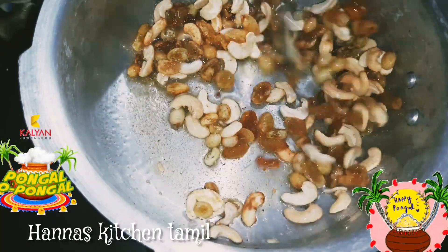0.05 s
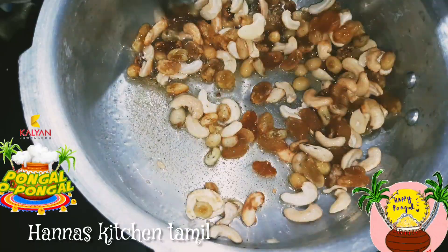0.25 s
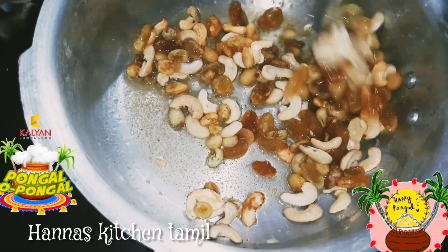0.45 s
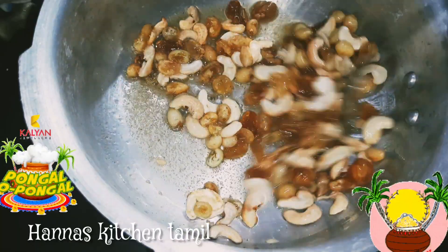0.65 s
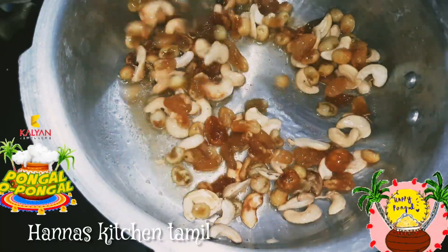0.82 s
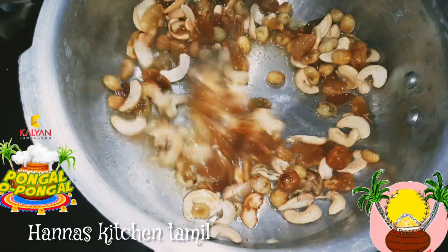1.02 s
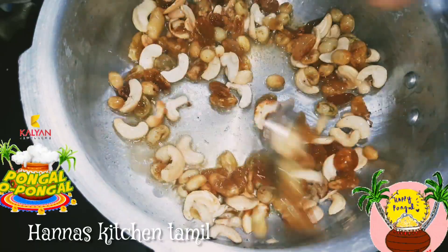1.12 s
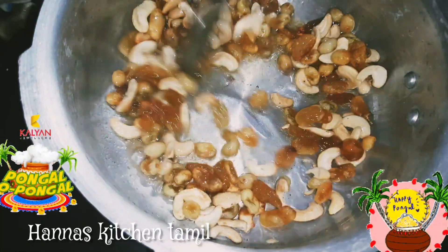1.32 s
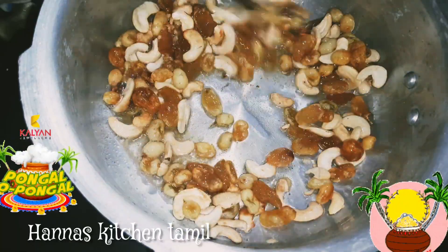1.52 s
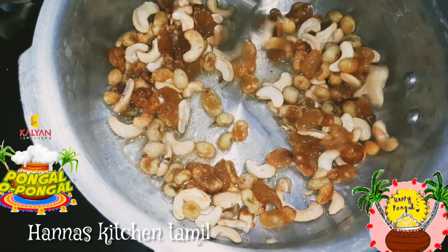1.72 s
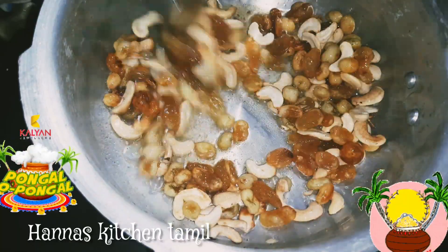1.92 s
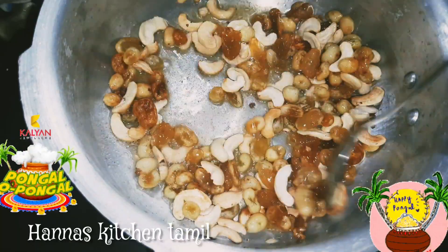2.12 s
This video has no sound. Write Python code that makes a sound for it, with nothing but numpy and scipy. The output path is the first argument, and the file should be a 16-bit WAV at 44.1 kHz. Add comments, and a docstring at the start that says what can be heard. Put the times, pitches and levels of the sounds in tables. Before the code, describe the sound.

Stirring frying nuts in a metal pot, with ringing spoon clinks, crackling fat and one hollow knock

```python
"""Nuts and raisins fry in a little fat in a thick metal pot, close up in a small kitchen.
The fat is flickering coloured noise under tiny sine bubbles, with snapping noise bursts for the spits.
Sliding nuts are a wavering low murmur, and dropped ones are single ringing modes.
A metal spoon clinks four times on the wall: a clash of dense noise, then a bank of ringing modes.
Once the base takes a hollow knock with a faint rebound. A stove rumbles below as low noise."""
import sys
import numpy as np
from scipy import signal
from scipy.fft import rfft, irfft, next_fast_len
from scipy.io import wavfile
from scipy.ndimage import uniform_filter1d, minimum_filter1d, map_coordinates

SR = 44100
rng = np.random.default_rng(int(sys.argv[2]) if len(sys.argv) > 2 else 0)


def transcribe(signal):
    """Save signal, clipped to [-1, 1], as a 16-bit WAV file at the path in sys.argv[1]."""
    frames = np.atleast_2d(signal).T
    limited = np.clip(frames, -1, 1)
    pcm = np.round(limited * 32767).astype(np.int16)
    wavfile.write(sys.argv[1], SR, pcm)


N = 94815


def amp(db):
    """Decibels to gain."""
    return 10 ** (np.asarray(db) / 20)


def unit(x):
    """Scaled to rms 1."""
    return x / np.sqrt(np.mean(x ** 2) + 1e-20)


def along(points, hz):
    """(Hz, value) points read on a log frequency axis."""
    point_hz, value = np.transpose(points)
    return np.interp(np.log(hz + 1), np.log(point_hz), value)


def over_time(points):
    """(s, value) points read at every sample of the scene."""
    return np.interp(np.arange(N) / SR, *np.transpose(points))


def around(hz, centre_hz):
    """A bell-shaped weight about an octave wide."""
    return np.exp(-2 * np.log2((hz + 1) / centre_hz) ** 2)


def add(track, start_s, sound):
    """Mix a stereo sound in at its start time, cut off at the end of the track."""
    part = track[:, round(start_s * SR):][:, :sound.shape[-1]]
    part += sound[..., :part.shape[1]]


def wobble(knots_per_s):
    """A smooth random curve through normally distributed knots."""
    knots = rng.standard_normal(512)
    return map_coordinates(knots, [np.arange(N) * knots_per_s / SR], mode="wrap")


def noise(colour_db, size):
    """Stereo noise of rms 1, its width and balance set per frequency; colour_db is a function of Hz."""
    # left-right likeness, 1 = identical, 0 = unrelated: pitch_hz, likeness
    alike = [(60, 0.7), (200, 0.86), (700, 0.65), (1400, 0.42), (3000, -0.13), (8000, 0.33), (15000, 0.36)]
    # how much louder the left is than the right: pitch_hz, left_right_db
    balance = [(60, 1.5), (200, 4), (700, 1.5), (1400, 0), (2400, -0.5), (7500, -2), (10000, 6.5),
               (15000, 3)]
    hz = np.fft.rfftfreq(size, 1 / SR)
    turn = np.arccos(np.clip(along(alike, hz), -1, 1)) / 2
    spectra = rfft(rng.standard_normal((2, size))) * amp(colour_db(hz))
    mid, side = spectra * [np.cos(turn), np.sin(turn)]
    lean = amp(along(balance, hz) / 2)
    return unit(irfft([(mid + side) * lean, (mid - side) / lean], size))


def fading(x, t60s, hold_s=0):
    """After a hold, each frequency of x dies at its own speed."""
    hz, t, z = signal.stft(x, SR, nperseg=128)
    gain = amp(-60 * np.maximum(t - hold_s, 0) / along(t60s, hz)[:, None])
    return signal.istft(z * gain, SR, nperseg=128)[1]


def ring(hz, t60_s, swell_s, lead_rad=0):
    """Half a second of one mode in stereo: it swells, then decays; the left leads by a phase angle."""
    t = np.arange(SR // 2) / SR
    decay = np.exp(-np.log(1000) * t / t60_s)
    swell = (1 - np.exp(-t / swell_s)) ** 2
    phase = np.array([[lead_rad], [-lead_rad]]) / 2
    return decay * swell * np.sin(2 * np.pi * hz * t + phase)


def kitchen(x, wet_db, delay_s=.008):
    """A sound followed by the room's short answer, a delayed tail of decaying noise."""
    # decay of the room: pitch_hz, t60_s
    room_t60 = [(150, 0.15), (800, 0.23), (3000, 0.3), (12000, 0.095)]
    tail = fading(rng.standard_normal((2, SR // 2)), room_t60)
    tail = np.pad(tail / np.linalg.norm(tail[0]), ((0, 0), (round(delay_s * SR), 0)))
    return x + amp(wet_db) * signal.fftconvolve(x, tail, axes=1)[:, :x.shape[1]]


def sizzle(crackle_db=-6, middle_hz=8000, cycles=5):
    """Fat hisses, with tiny bursting bubbles on top, each a decaying sine a few cycles long."""
    # colour of the hiss: pitch_hz, relative_db_per_hz
    hiss_colour = [(500, -10.5), (1900, -4.5), (3200, -4), (4200, -3.5), (6000, -3.5), (7600, 2.5),
                   (9400, -10), (12000, -2), (15600, -9)]
    # it swells as the spoon turns fresh food onto the hot base: time_s, level_db
    hiss_level = [(0, -39), (.22, -37.5), (.4, -39), (.78, -38.5), (.92, -36.5), (1.02, -38.5),
                  (1.22, -35.5), (1.38, -39), (1.66, -35.5), (1.9, -38.5), (2.15, -36.5)]
    bubbles_per_s, spread_db = 900, 2.5
    count = int(bubbles_per_s * N / SR)
    when, pitch, size, side, lag = rng.random((count, 5)).T[:, :, None]
    k = np.arange(128)
    # pitches cluster around the middle one, with rarer ones far off
    hz = np.clip(middle_hz * 2 ** (.4 * np.log(pitch / (1 - pitch))), 1500, 15500)
    turns = hz * k / SR
    # most bubbles are faint, a few are loud
    grains = amp(-spread_db * np.log(size + 0.01)) * np.exp(-turns / cycles)
    at = ((when * N).astype(int) + k).ravel()

    def channel(gain, shift):
        waves = grains * gain * np.sin(2 * np.pi * (turns + shift))
        return np.bincount(at, waves.ravel(), N + len(k))[:N]

    # the crackle leans well to the left; each bubble has a random phase on the right
    crackle = np.array([channel(8.4 * np.sqrt(side), 0), channel(np.sqrt(1 - side), lag)])
    flicker = amp(2.38 * wobble(160))
    hiss = noise(lambda hz: along(hiss_colour, hz), N) * flicker
    return amp(over_time(hiss_level)) * (hiss + amp(crackle_db) * unit(crackle))


def nuts():
    """Nuts slide over the base in a hollow murmur; a few drop onto it, each ringing one short mode."""
    # colour of the sliding: pitch_hz, relative_db_per_hz
    slide_colour = [(280, -15), (420, -7), (480, -16), (600, 0), (720, -8.5), (850, -7.5), (1030, -37),
                    (1400, -2.5), (1800, -54), (4000, -29.5)]
    # loudness of the sliding: time_s, level_db
    slide_level = [(0, -53), (.4, -47), (2.15, -45.5)]
    # nuts dropping off the spoon: start_s, level_db, pitch_hz
    tumbles = [(0.336, -30.5, 1460), (0.358, -28.5, 1536), (.495, -33, 598), (.851, -30.5, 608),
               (1.104, -32.5, 602), (1.328, -32, 837), (1.332, -30.5, 608), (1.607, -34.5, 856),
               (1.963, -34.5, 650), (2.076, -32.5, 597)]
    drops = np.zeros((2, N))
    for start_s, level_db, pitch_hz in tumbles:
        add(drops, start_s, amp(level_db) * ring(pitch_hz, t60_s=0.06, swell_s=0.00049))
    waver = amp(2.5 * wobble(35.4))
    slide = unit(noise(lambda hz: along(slide_colour, hz), N) * waver)
    return kitchen(drops, wet_db=-7.5) + amp(over_time(slide_level)) * slide


def stove():
    """The stove's low rumble is steady noise shaped to the bass."""
    # colour of the rumble: pitch_hz, relative_db_per_hz
    rumble_colour = [(28, -54), (58, -6.5), (140, -0.5), (200, -2.5), (300, -11.5), (600, -21)]
    return amp(-49.5) * noise(lambda hz: along(rumble_colour, hz), N)


def spits(snap_s=0.00088, rattle=0.37, rattle_t60_s=0.016, half_width_octaves=0.27):
    """Larger droplets burst with a sharp snap that rattles briefly round the pot."""
    # spits of fat, levels relative to each other: start_s, level_db, pitch_hz
    droplets = [(.046, -22, 6540), (0.0512, -24, 7300), (0.094, -24, 7650), (0.105, -22, 12000),
                (0.1486, -19.5, 8800), (0.4349, -23.5, 4130), (.506, -29.5, 7600), (0.5686, -20, 4800),
                (0.6366, -20.5, 5500), (0.96, -17, 9400), (0.966, -22, 6240), (1.0289, -20.5, 3600),
                (1.288, -22.5, 6500), (1.2969, -24, 10700), (1.531, -13, 9200), (1.5611, -20.5, 10600),
                (1.576, -23, 6000), (1.679, -25, 5700), (1.685, -22.5, 6400), (1.955, -20.5, 6640),
                (2.002, -23.5, 7380)]
    all_db = -12  # trims every spit
    out, t = np.zeros((2, N)), np.arange(512) / SR
    envelope = np.exp(-t / snap_s) + rattle * np.exp(-np.log(1000) * t / rattle_t60_s)
    for start_s, level_db, pitch_hz in droplets:

        def band_db(hz):
            octaves = np.log2((hz + 1) / pitch_hz)
            return -10 * np.log10(1 + (octaves / half_width_octaves) ** 4)

        burst = noise(band_db, len(t))
        add(out, start_s, amp(level_db + all_db) * unit(burst * envelope))
    return kitchen(out, wet_db=-13)


def clash(far_db=0, tilt_db=0, rise_s=0.00067):
    """The burst of countless short-lived modes at a hard contact, made of fading noise."""
    # colour of the contact: pitch_hz, relative_db_per_hz
    clash_colour = [(25, -54), (55, -3.5), (250, -16.5), (800, 1), (1500, -3), (2600, 0), (4500, 0),
                    (8000, 3), (10000, -3.5), (15500, -5.5)]
    # decay of the contact: pitch_hz, t60_s
    clash_t60 = [(100, 0.25), (1000, 0.052), (14000, 0.018)]
    far_hz = 4300  # the far side clashes brighter around here
    hold_s = 0.0041  # sound trapped in the pot holds the clash up before it fades

    def colour_db(hz):
        return along(clash_colour, hz) + far_db * around(hz, far_hz) + tilt_db * np.log2(1 + hz / far_hz)

    t = np.arange(SR // 2) / SR
    burst = fading(noise(colour_db, SR), clash_t60, hold_s)[:, :len(t)]
    return burst * (1 - np.exp(-t / rise_s))


def spoon():
    """Every clink is a brief clash, then the clear ring of the wall, coloured by where the spoon lands."""
    # spoon on the wall, place 0 = usual spot .. 1 = far side:
    # start_s, level_db, scrape_db, place, clang_db, scrape_tilt_db_per_octave
    clinks = [(0.2312, -20.5, -16.5, 0.16, -9.5, 3), (0.5714, -22.5, -11.5, 0.88, -1.5, 0),
              (1.427, -20.5, -10, 0.18, -1, 2.5), (1.8217, -22.5, -15, 0, 2.5, -1)]
    # modes of the wall: pitch_hz, level_db, t60_s, swell_s, left_right_db, left_lead_rad, far_side_change_db
    wall_modes = [(383, -12, 0.24, 0.013, 0, 1.5, 4.5), (423.2, 5, 0.25, 0.023, 1.5, -0.07, -17),
                  (1126.5, -10.5, 0.16, 0.0016, 8, -1.5, -1), (1275, 1.5, 0.17, 0.0022, -2, -2, -6.5),
                  (1426, -2.5, 0.021, 0.00049, -25, 3.5, -14), (2089, -1, 0.23, 0.0003, -0.5, 2.5, 3),
                  (2090, 21.5, 0.25, .3, 11, 2, 18.5), (2122, 3.5, 0.078, 0.0011, -8, 1.5, -0.5),
                  (2990, 0.5, 0.21, 0.0032, -2, 1.48, 7.5), (3750, -9, 0.13, 0.00057, 8, 0.8, 4),
                  (4410, -15.5, 0.053, 0.00034, 13, -8, 16.5), (4585, -3.5, 0.16, 0.0016, 7.5, 0.2, -3),
                  (4980, -10.5, 0.05, 0.0011, 10.5, 2, 19), (5350, -9, 0.095, .0006, 2, 0, -9),
                  (6780, -2.5, 0.053, 0.00033, -6, 0, 8.5)]
    clang_hz = 2600  # a glancing touch excites the modes around here less
    waver_db, waver_per_s = 2.5, 55
    brighter_far_db = 7.5
    out = np.zeros((2, N))
    for start_s, level_db, scrape_db, place, clang_db, tilt_db in clinks:
        wall = 0
        for hz, mode_db, t60_s, swell_s, pan_db, lead_rad, far_db in wall_modes:
            struck_db = mode_db + place * far_db + clang_db * around(hz, clang_hz)
            sides_db = np.array([[pan_db], [-pan_db]]) / 2
            waver = waver_db * wobble(waver_per_s)[:SR // 2]
            wall = wall + amp(struck_db + sides_db + waver) * ring(hz, t60_s, swell_s, lead_rad)
        scrape = amp(scrape_db) * clash(place * brighter_far_db, tilt_db)
        add(out, start_s, kitchen(amp(level_db) * wall, wet_db=-11.5, delay_s=.02))
        add(out, start_s, kitchen(scrape, wet_db=-8))
    return out


def knocks():
    """The base gives a hollow knock and rebounds: a few ringing modes with a small clash as the click."""
    # knock and rebound: start_s, level_db, click_db
    hits = [(0.2873, -6, -21), (.359, -26.5, -35)]
    # modes of the base: pitch_hz, level_db, t60_s
    base_modes = [(225, -15.5, 0.045), (424.9, -21, 0.39), (653, -0.5, 0.051), (806, -4.5, 0.083),
                  (1283, -6.5, 0.0275), (2176, -23.5, 0.073)]
    out = np.zeros((2, N))
    for start_s, level_db, click_db in hits:
        body = sum(amp(mode_db) * ring(hz, t60_s, swell_s=0.00044) for hz, mode_db, t60_s in base_modes)
        hit = amp(level_db) * body + amp(click_db) * clash()
        add(out, start_s, kitchen(hit, wet_db=-10.0, delay_s=0.031))
    return out


def limited(x, limit_db=-0.6, release_s=0.015):
    """The gain ducks at once under a loud peak and recovers slowly."""
    over = np.log(np.maximum(np.abs(x).max(axis=0) / amp(limit_db), 1))
    recovery = np.exp(np.arange(N) / SR / release_s)
    duck = np.maximum.accumulate(over * recovery) / recovery
    # about a millisecond of smoothing, so the gain moves without clicks
    gain = uniform_filter1d(minimum_filter1d(np.exp(-duck), size=45), size=45)
    return x * gain


def scene():
    """The frying pot, the spoon and the knock over the low rumble of the stove."""
    return sizzle() + nuts() + stove() + spits() + spoon() + knocks()


def record(dry):
    """The recorder limits the peaks and keeps nothing above its band limit."""
    top_hz = 15900
    m = next_fast_len(N + SR // 2)
    kept = np.fft.rfftfreq(m, 1 / SR) < top_hz
    return irfft(rfft(limited(dry), m) * kept, m)[:, :N]


dry = scene()
out = record(dry)
transcribe(out)
```